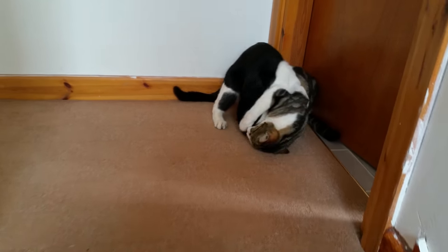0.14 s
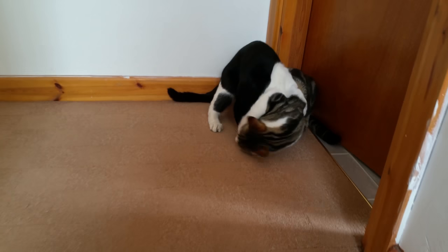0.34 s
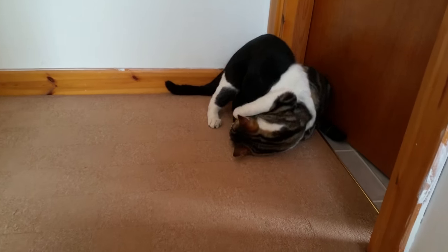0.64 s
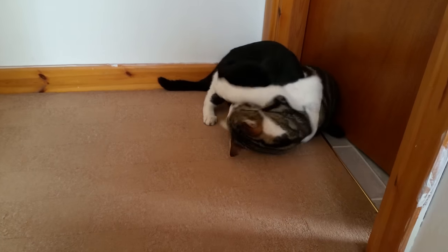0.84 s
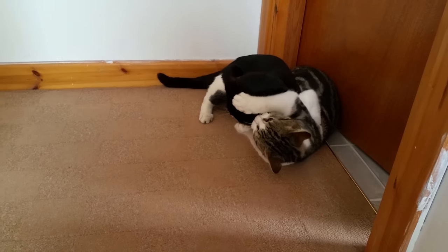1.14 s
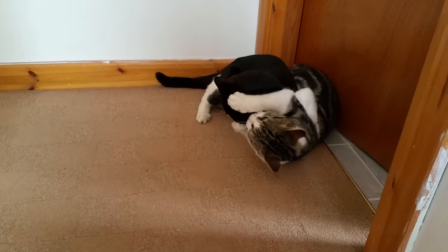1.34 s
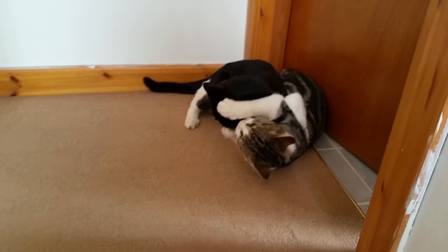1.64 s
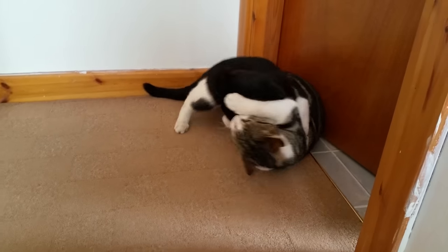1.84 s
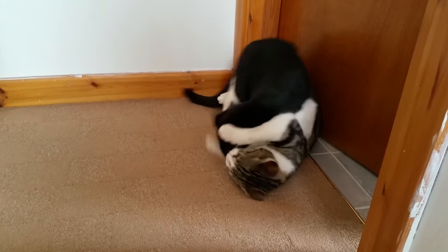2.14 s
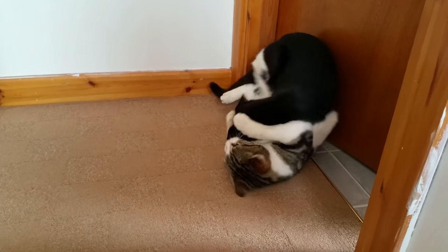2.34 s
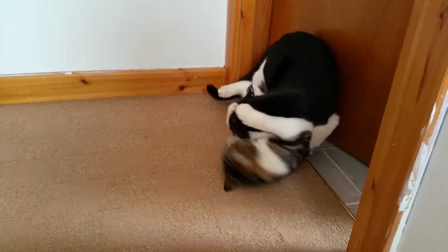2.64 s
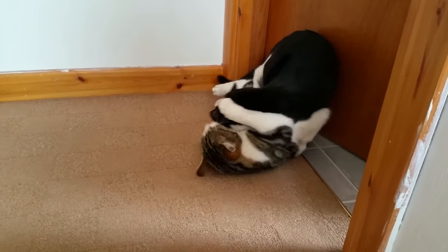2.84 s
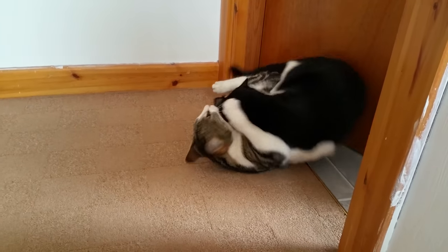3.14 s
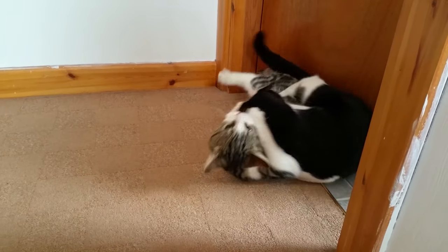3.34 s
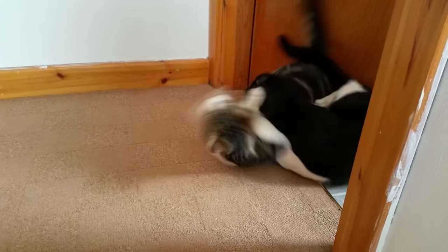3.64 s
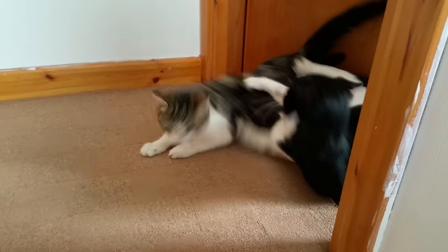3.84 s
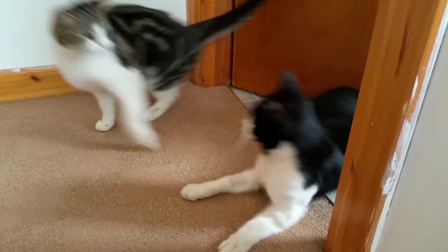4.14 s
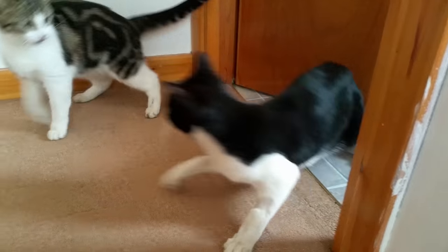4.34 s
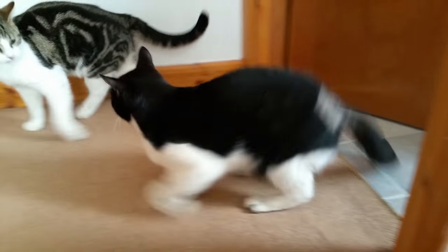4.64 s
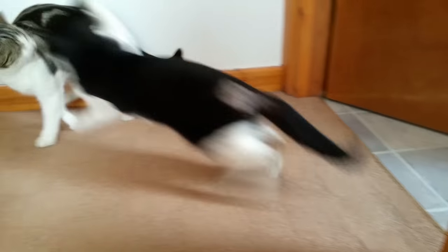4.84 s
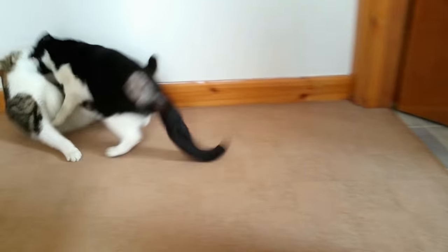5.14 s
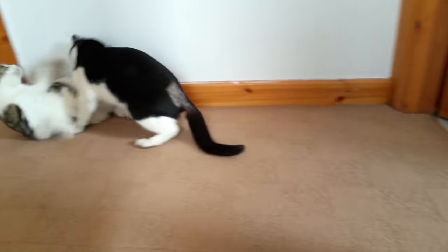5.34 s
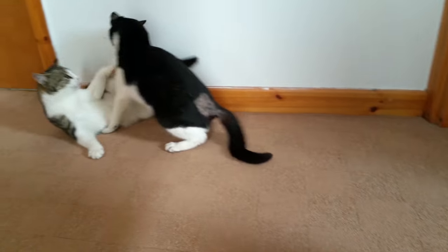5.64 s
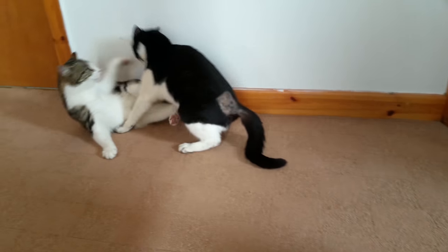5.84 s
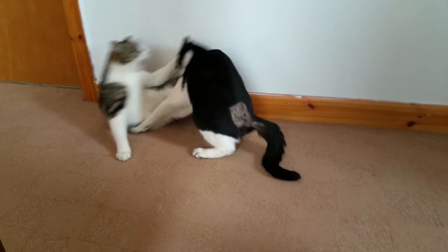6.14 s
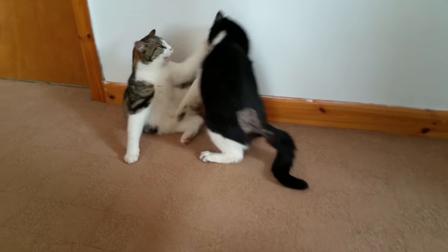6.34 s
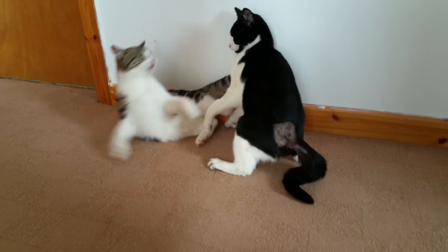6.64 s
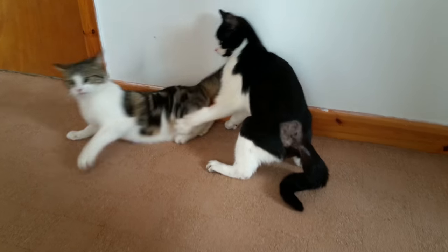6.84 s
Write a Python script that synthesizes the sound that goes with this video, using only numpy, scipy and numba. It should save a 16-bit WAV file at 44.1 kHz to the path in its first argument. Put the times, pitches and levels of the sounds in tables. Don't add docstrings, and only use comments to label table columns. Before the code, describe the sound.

Two cats wrestle on carpeted boards, captured by a nearby hand-held phone. One muffled yowl comes first, then mostly house hum and small scuffs, then squeaks and a chirp amid thudding bodies. A wail and very loud yelp follow, then a hoarse broken cry with a sharp claw scratch. Bare walls add a short reverberation.

```python
import sys
import numpy as np
from scipy import signal
from scipy.fft import rfft, irfft
from scipy.io import wavfile
from scipy.ndimage import uniform_filter1d, map_coordinates
from numba import njit

SR = 44100
rng = np.random.default_rng(int(sys.argv[2]) if len(sys.argv) > 2 else 0)


def volts_from_db(level):
    exponent = np.asarray(level, float) / 20
    return 10 ** exponent


def output_pcm(signal):
    pcm = np.clip(np.atleast_2d(signal).T, -1, 1) * 32767
    wavfile.write(sys.argv[1], SR, np.round(pcm).astype(np.int16))


N = 308700

# (frequency [Hz], density [dB/Hz])
HOUSE_SPECTRUM = [(12, -37), (20, -18.5), (53, -27.5), (76, -9.5), (274, -5), (372, -10), (550, -7),
                  (632, -12), (1100, -19.5), (1230, -17.5), (1500, -16.5), (3360, -33), (4440, -29.5),
                  (4960, -36), (15600, -44.5)]
# (frequency [Hz], likeness [0-1])
HOUSE_LIKENESS = [(60, 0.89), (250, 1), (600, 0.63), (1200, 0), (4000, .0)]
# (centre [Hz], width [Hz], level [dB])
HUMS = [(283, 17.3, -65.5), (426, 4, -70.5), (548.8, 9.4, -66), (660, 14, -77), (1072, 7.9, -77),
        (1495, 13, -72.5), (1481, 18, -77.5), (5220, 660, -82.5)]
# (time [s], level [dB])
WHINE_SWELLS = [
    (0.481, -73.5),
    (1.62, -83.5),
    (2.58, -87),
    (3.65, -113),
    (4.741, -80),
    (5.45, -81.5),
    (6.098, -85),
    (6.799, -88),
]
# (time [s], lag [rad])
WHINE_LAG = [(0, 2.7), (4.7, -.4), (6.4, -.6)]
# (time [s], level [dB], fade [dB/s])
WEIGHT_SHIFTS = [(0.0, -48.5, 211), (1.151, -66, 13), (2.161, -72, 60), (2.949, -55, 61),
                 (3.137, -47.5, 96), (3.47, -54, 25), (3.848, -40.5, 86), (4.001, -51, 43),
                 (4.388, -49, 123), (4.861, -49, 104), (5.161, -39.5, 73), (5.761, -48, 172),
                 (6.49, -41.5, 112), (6.95, -57, 30)]
# (time [s], peak [dB], floor ring [Hz], ring T60 [s], slap [dB])
THUMPS = [(0.009, -45.5, 255, 0.17, -11.5), (0.211, -52, 178, 0.13, 5), (0.952, -48, 160.2, 0.17, 5),
          (1.088, -46, 217, 0.19, -25), (1.169, -52, 238, 0.32, -2), (2.779, -56, 206, 0.49, 10.5),
          (2.924, -50, 216, 0.21, -5), (3.131, -42, 108.8, 0.4, -34), (3.446, -43.5, 86, 0.27, -33),
          (3.838, -26.5, 118, 0.1, -33), (3.84, -34.5, 85, 0.28, -34), (4.199, -52, 84, 0.3, -22),
          (4.299, -35, 190, 0.064, -24), (4.393, -42, 110, 0.13, -32), (4.847, -54, 109, 0.22, -22),
          (5.163, -33.5, 243.4, 0.18, 0.5), (5.299, -34, 231.5, 0.082, -20), (5.39, -47, 73.2, 0.12, 6.5),
          (5.49, -49.5, 229.6, 0.22, 5.5), (5.734, -45.5, 182.7, 0.37, 0), (6.482, -36.5, 156.6, 0.14, -2),
          (6.589, -46, 136, 0.11, -27)]
# (time [s], peak [dB], centre [Hz], length [s])
SCUFFS = [(0.08, -41, 1900, 0.0075), (0.666, -58, 2130, 0.017), (0.962, -71, 1950, 0.022),
          (1.6194, -73, 4380, 0.018), (1.949, -50, 1940, 0.028), (2.209, -47.5, 1600, 0.023),
          (2.917, -45, 1700, 0.015), (3.168, -63, 1870, 0.023), (3.348, -47.5, 2030, 0.026),
          (3.5563, -36, 2036, 0.017), (3.748, -33, 2114, 0.027), (4.077, -41.5, 1670, 0.034),
          (4.531, -69, 4400, 0.02), (4.938, -69, 4390, 0.022), (5.829, -68.5, 4400, 0.019),
          (6.253, -24, 1773, 0.013), (6.475, -61.5, 2050, 0.02), (6.916, -45.5, 1750, 0.028)]
# (time [s], pitch [Hz], effort [dB], jaw opening [0-1], tongue resonance [Hz])
MEW = [(0.195, 416.8, -78, 0, 2880), (0.213, 426, -51.5, 0.16, 2780), (0.25, 507.3, -58.5, 0.08, 2820),
       (0.29, 625, -57, 0.34, 2800), (0.335, 605, -59, 0.3, 2750), (0.362, 645, -58, 0.25, 2600),
       (0.395, 665, -55, 0.33, 2660)]
YOWL = [(0.399, 682, -58.5, 0.2, 2700), (0.446, 703, -51.5, 0.62, 2940), (0.521, 680, -49.5, 0.54, 2620),
        (0.631, 706, -47, 0.66, 2760), (0.716, 672, -56.5, 0.1, 2730), (0.759, 690, -58.5, 0.2, 2780),
        (0.885, 668, -51, 0.28, 2250), (0.957, 671, -52.5, 0.53, 2260), (0.999, 680, -80, 0.27, 2600)]
GRUNT = [(2.747, 412.4, -76, 0.63, 2500), (2.754, 414, -58, 0.62, 2500), (2.767, 386, -81, .9, 2500),
         (2.774, 379, -44, 0.67, 2500), (2.795, 363.6, -48.5, 0.53, 2605), (2.812, 328.4, -58, 0.17, 2860),
         (2.831, 345, -64, 0.18, 2750)]
SQUEAK = [(3.483, 1150, -71, 0.31, 2380), (3.498, 1173, -43, 0.41, 2350), (3.517, 1192, -45, 0.24, 2350),
          (3.525, 645, -34, 0.61, 2360), (3.537, 590.5, -51, 0.18, 2300), (3.552, 621, -39.5, 0.63, 2480),
          (3.568, 578.7, -57, 0.4, 2620), (3.584, 577, -77, 0.54, 2700)]
SQUEAL = [(3.655, 582, -65, 0.21, 2900), (3.667, 585.4, -39.5, 0.57, 3150),
          (3.695, 531.5, -39.5, 0.45, 3280), (3.722, 539.6, -39, 0.68, 2670), (3.733, 556, -43, 0.97, 2730),
          (3.785, 526.4, -51.5, 0.35, 2770)]
CHIRP = [(3.791, 1153, -65, 0.28, 2480), (3.805, 1250, -47, 0.049, 2420), (3.814, 1408, -51.5, 0.52, 2770),
         (3.83, 1379, -50.5, 0.11, 2800), (3.855, 1419, -74, 0.54, 2650)]
WAIL = [(5.036, 675, -67, 0.41, 2900), (5.054, 673, -54, 0.62, 2800), (5.088, 693, -49.5, 0.48, 3190),
        (5.139, 750.5, -45.5, 0.46, 3500), (5.178, 712.7, -41.5, 0.35, 3200),
        (5.205, 680, -26.5, 0.9, 2800), (5.217, 609.2, -37.5, 0.66, 2609), (5.26, 545, -45, 0.42, 2540),
        (5.319, 534.7, -74.5, 0.27, 2680)]
YELP = [(5.33, 691, -57, .3, 2960), (5.342, 734, -37, 0.79, 3000), (5.356, 745, -15.5, .95, 3020),
        (5.368, 735, -33, 0.5, 2950), (5.375, 755, -16.5, 0.9, 2690), (5.385, 715, -25, 0.9, 2700),
        (5.402, 680, -32, 0.85, 2570), (5.43, 687, -41, .6, 2800)]
CRY = [(6.228, 522, -58, 0.26, 2980), (6.251, 539.4, -51, 0.49, 3040), (6.269, 580, -46, 0.76, 4000),
       (6.298, 645, -45, 0.72, 3920), (6.339, 686.5, -51, 0.36, 3860), (6.376, 715, -41, 0.55, 3100),
       (6.392, 641.7, -41, 0.64, 3840), (6.42, 667, -59, 0.37, 3660), (6.446, 653.5, -58, 0.37, 3380)]
SOB = [(6.452, 663, -49.5, 0.53, 3000), (6.478, 659, -44, 0.6, 2900), (6.489, 725, -44, 0.45, 2830),
       (6.509, 725, -54, 0.41, 2920), (6.541, 742, -51, 0.54, 2880), (6.57, 750.2, -86, 0.44, 2930)]
CALLS = [
    MEW,
    YOWL,
    GRUNT,
    SQUEAK,
    SQUEAL,
    CHIRP,
    WAIL,
    YELP,
    CRY,
    SOB,
]
# (mouth resonance [Hz], upper [dB], rasp [dB], chest [dB], chest resonance [Hz])
CALL_COLOUR = [(2240, -7.5, -21.5, 1.5, 1030), (2050, -5.5, -31, 2, 1550), (2080, -10, -22, -1, 1200),
               (2050, -8, -18.5, -4, 1265), (1950, -34, -10.5, -2, 1200), (2030, -0.5, -1, 0, 1280),
               (2060, -5, -12, 4, 1410), (2007, -35, -14, 1, 1290), (2094, -6.5, -17, -0.5, 1220),
               (2050, -6.5, -45, -2, 2000)]
CALL_HOARSENESS = [(.65, .36, .15), (.1, .055, .5), (.05, .3, .35), (.06, .25, .55), (.45, .14, .4),
                   (.12, .12, .25), (.3, .11, .4), (.03, .16, .55), (.6, .15, .25), (.35, .13, .1)]
# (time [s], centre [Hz])
TEETH_RESONANCE = [(3.9, 5200), (5.0, 4355), (5.4, 4276), (6.3, 4500), (6.5, 3980)]
# (time [s], peak [dB], ring [Hz], ring decay [s])
KNOCKS = [
    (0.222, -39.5, 781, 0.01),
    (2.929, -43, 505, 0.0078),
    (5.165, -41, 610, 0.011),
    (5.736, -48, 590, 0.0044),
    (6.4835, -36, 830, 0.0033),
    (6.497, -57, 460, 0.0063),
]
# (time [s], peak [dB], centre [Hz])
CLAW_TICKS = [
    (3.558, -52, 5732),
    (3.662, -61, 5000),
    (3.772, -57, 5150),
    (4.09, -50, 6740),
    (4.505, -58, 12800),
    (4.948, -63, 3045),
    (5.811, -59, 5510),
    (6.254, -55, 7230),
]
# (frequency [Hz], T60 [s])
ROOM_T60 = [(100, 0.14), (700, 0.45), (2200, 0.24), (8000, 0.12)]
# (time [s], delay [s])
RIGHT_DELAY = [(4.2, .00005), (4.9, .00028), (5.6, .00028), (6.1, .00017)]
# (centre [Hz], width [Hz], share removed [0-1])
PORT_SHADOWS = [(4350, 1000, .4), (2500, 1500, .65)]
# (time [s], share [0-1])
RIGHT_SHADOW = [(5.3, 1), (5.34, .3), (5.6, .3), (6.0, 1)]


def unit(x):
    return x / np.sqrt(np.mean(x ** 2) + 1e-18)


@njit
def svf(x, centre_hz, width_hz):
    y, band_state, low_state = np.empty(len(x)), 0., 0.
    for i in range(len(x)):
        g = np.tan(np.pi * centre_hz[i] / SR)
        k = width_hz / centre_hz[i]
        v = (band_state + g * (x[i] - low_state)) / (1 + g * (g + k))
        band_state = 2 * v - band_state
        low_state += 2 * g * v
        y[i] = k * v
    return y


def band(x, centre_hz, width_hz):
    return svf(x, centre_hz + np.zeros(len(x)), float(width_hz))


def walk(rate_hz, count=N):
    hold = max(int(SR / rate_hz), 1)
    steps = np.repeat(rng.standard_normal(count // hold + 2), hold)
    return 1.427 * uniform_filter1d(uniform_filter1d(steps, hold), hold)[:count]


def over_time(table, t):
    return np.interp(t, *np.transpose(table))


def on_log(table, hz):
    f, v = np.transpose(table)
    return np.interp(np.log(np.maximum(hz, 1)), np.log(f), v)


def add(out, start_s, x):
    i = max(int(start_s * SR), 0)
    out[i:i + len(x)] += x[:len(out) - i]


def appliance_air():
    f = np.fft.rfftfreq(N, 1 / SR)
    alike = np.clip(on_log(HOUSE_LIKENESS, f), 0, 1)
    spectra = rfft(rng.standard_normal((2, N))) * volts_from_db(on_log(HOUSE_SPECTRUM, f))
    mid, side = spectra * np.sqrt([1 + alike, 1 - alike])
    air = irfft(np.array([mid + side, mid - side]), N)
    level_db = -57.5 + 0.077 * walk(3.9)
    return air / np.sqrt(np.mean(air.mean(axis=0) ** 2)) * volts_from_db(level_db)


def motor_tones():
    motor_hz, motor_db = 548.3, -61
    out = np.zeros((2, N))
    for hz, width_hz, db in HUMS:
        tone, other = (unit(band(rng.standard_normal(N), hz, width_hz)) for _ in range(2))
        out = out + volts_from_db(db) * (tone + 0.5 * other * np.array([[1], [-1]]))
    phase = 2 * np.pi * np.cumsum(motor_hz + 1.619 * walk(1.8)) / SR
    return out + np.sqrt(2) * volts_from_db(motor_db + 1.65 * walk(5.6)) * np.sin(phase)


def whine():
    whine_hz, rest_db, swell_s = 4390, -90, 0.34
    t = np.arange(N) / SR
    swell = volts_from_db(rest_db) + sum(volts_from_db(db) * np.exp(-((t - s) / swell_s) ** 2) for s, db in WHINE_SWELLS)
    phase = 2 * np.pi * np.cumsum(whine_hz + 8 * walk(1.6)) / SR
    left = np.sin(phase)
    right = 1.45 * np.sin(phase - over_time(WHINE_LAG, t))
    return np.sqrt(2) * swell * volts_from_db(5.0) * np.array([left, right])


def house():
    return (appliance_air() + motor_tones()) * volts_from_db([[.7], [-.7]]) + whine()


def shuffle():
    rise_db_per_s, still_db = 1200, -67.5
    t = np.arange(N) / SR
    weight = volts_from_db(still_db)
    for s, db, fade_db_per_s in WEIGHT_SHIFTS:
        drop_db = np.where(t < s, rise_db_per_s * (s - t), fade_db_per_s * (t - s))
        weight = weight + volts_from_db(db - drop_db)
    rumble = band(band(band(rng.standard_normal(N), 35.0, 80), 237, 190), 86, 260)
    return unit(rumble) * weight * volts_from_db(1.1 * walk(17) - 5.5)


def thumps():
    out, t = np.zeros(N), np.arange(SR // 2) / SR
    for s, peak_db, hz, t60_s, slap_db in THUMPS:
        noise = rng.standard_normal((2, len(t)))
        push = 1 - np.exp(-t / 0.0052)
        fade = push * np.exp(-np.log(1000) * t / max(t60_s, .02))
        ring = np.sin(2 * np.pi * hz * t) * np.exp(-t / 0.45)
        ring = ring + 0.51 * unit(band(noise[0], hz * 1.97, hz))
        slap = unit(band(band(noise[1], 492, 290), 470, 470))
        slap = slap * (np.exp(-t / 0.025) + 2.3 * np.exp(-t / 0.0066))
        slap = slap + 0.87 * np.sin(2 * np.pi * 350 * t) * np.exp(-t / 0.017)
        add(out, s, volts_from_db(peak_db - 2.0) * (fade * ring + volts_from_db(slap_db - 5.0) * slap))
    return out


def scuffs():
    out, t = np.zeros(N), np.arange(SR // 8) / SR
    for s, peak_db, hz, length_s in SCUFFS:
        grit = rng.standard_normal(len(t)) * volts_from_db(3 * rng.exponential(size=len(t)))
        scratch = unit(band(band(grit, hz, 0.33 * hz), 1800, 6000))
        x = t / max(length_s, .002) * 3
        add(out, s, volts_from_db(peak_db - 11) * scratch * x * np.exp(1 - x) / 2)
    return out


def gestures(t):
    settle, fray = .3, .85
    crack_s, crack_length_s, crack_rough = .66, .022, .25
    s, *moves = np.transpose(np.vstack(CALLS))
    s = np.maximum.accumulate(s)
    colours = np.repeat(CALL_COLOUR, [len(rows) for rows in CALLS], axis=0).T
    smooth = [uniform_filter1d(np.interp(t, s, c), SR // 200) for c in (*moves, *colours)]
    at = [np.interp([0, settle, fray, 1], [0, 1], [rows[0][0], rows[-1][0]]) for rows in CALLS]
    at = np.maximum.accumulate(np.concatenate(at))
    levels = np.concatenate([(onset, body, body, end) for onset, body, end in CALL_HOARSENESS])
    crack = crack_rough * np.exp(-((t - crack_s) / crack_length_s) ** 2)
    return (*smooth, np.interp(t, at, levels) + crack)


def vocal_folds(hz, rough):
    wobble = 1 + .007 * walk(55)
    wobble = wobble + .12 * rough * walk(300)
    phase = 2 * np.pi * np.cumsum(hz * wobble) / SR
    folds = sum(volts_from_db(2.2 * walk(50)) * np.cos(k * phase + .3 * k * k) for k in range(1, 13)) / np.sqrt(6)
    folds = folds * (1 + 0.043 * rough * np.cos(phase / 2))
    puffs = rng.standard_normal(N) * (1 + 1.0 * np.cos(phase))
    source = np.sqrt(1 - rough) * folds + np.sqrt(rough) * .9 * puffs
    return source, puffs, phase


def cat():
    t = np.arange(N) / SR
    hz, effort_db, jaw, upper_hz, mouth_hz, upper_db, rasp_db, chest_db, chest_hz, rough = gestures(t)
    mouth_hz = mouth_hz + 335 * (jaw - .5)
    chest_db = chest_db + 9.5 - 36.5 * jaw
    upper_db = upper_db - 15 * (jaw - .5) + 3.5 * (upper_hz / 1000 - 2.7)
    rasp_db = rasp_db - 16 * (jaw - .5)
    source, puffs, phase = vocal_folds(hz, rough)

    mouth = unit(band(band(band(source, mouth_hz, 670), mouth_hz, 1100), mouth_hz, 1400))
    chest = unit(band(band(source, chest_hz, 610), chest_hz * 0.76, 610))
    nasal = (t > .22) * (t < .94)
    chest = chest - volts_from_db(0.24) * nasal * np.sin(phase)
    upper = unit(band(band(band(source, upper_hz, 800), upper_hz, 1000), upper_hz, 2400))
    breathy = source + 3.6 * rough * puffs
    teeth_hz = over_time(TEETH_RESONANCE, t)
    teeth = band(band(breathy, teeth_hz, 950), teeth_hz * 1.465, 6400)
    hiss = band(band(breathy, 11100, 3900), 13000, 7200)
    rasp = unit(teeth + volts_from_db(-29.5) * hiss)
    colour = mouth - volts_from_db(chest_db) * chest - volts_from_db(upper_db) * upper + volts_from_db(rasp_db) * rasp

    voiced = sum((t > rows[0][0] - .002) & (t < rows[-1][0] + .008) for rows in CALLS) > 0
    gate = uniform_filter1d(voiced * 1., SR // 150)
    throb_hz, crest_s, depth_db = 16, .59, 2.5
    throb_db = depth_db * (t > .43) * (t < .93) * np.cos(2 * np.pi * throb_hz * (t - crest_s))
    flutter = volts_from_db(1.2 * walk(55)) * volts_from_db(throb_db)
    return gate * flutter * volts_from_db(effort_db - 1.5) * colour


def knocks():
    out, t = np.zeros(N), np.arange(SR // 10) / SR
    for s, peak_db, hz, decay_s in KNOCKS:
        add(out, s, volts_from_db(peak_db) * np.sin(2 * np.pi * hz * t) * np.exp(-t / max(decay_s, .001)))
    return out


def claw_ticks():
    out, t = np.zeros(N), np.arange(SR // 50) / SR
    for s, peak_db, hz in CLAW_TICKS:
        click = unit(band(band(rng.standard_normal(len(t)), hz, hz * .8), hz, hz * 1.2))
        add(out, s, volts_from_db(peak_db) * click * np.exp(-t / 0.00034))
    return out


def wall_tail(wet_db):
    t = np.arange(int(.7 * SR)) / SR
    tail = 0
    for hz in 90 * 2 ** np.arange(0, 7.1, 1):
        mid, side = (band(n, hz, hz * 2.24) for n in rng.standard_normal((2, len(t))))
        noise = mid + min(hz / 900, 1.3) * side * np.array([[1], [-1]])
        decay = np.exp(-np.log(1000) * t / on_log(ROOM_T60, hz))
        tail = tail + noise / np.std(noise) * np.sqrt(hz) * decay
    tail = tail * np.clip((t - .003) / 0.0054, 0, 1)
    return tail / np.sqrt(np.sum(tail ** 2) / 2) * volts_from_db(wet_db)


def room(x, wet_db, left_db):
    tail = wall_tail(wet_db)
    shade = np.exp(-np.arange(40) / 1.97)
    left = volts_from_db(left_db) * np.convolve(x, shade / shade.sum())[:N]
    i = np.arange(N)
    lag = 2 + SR * over_time(RIGHT_DELAY, i / SR)
    right = volts_from_db(-left_db) * map_coordinates(x, [i - lag], mode="nearest")
    return signal.fftconvolve(x[None], tail, axes=1)[:, :N] + np.array([left, right])


def ports(x):
    strengths = [1, over_time(RIGHT_SHADOW, np.arange(N) / SR)]
    out = []
    for v, strength, (hz, width_hz, share) in zip(x, strengths, PORT_SHADOWS):
        out.append(v - strength * share * band(v, hz, width_hz))
    return np.array(out)


def scene():
    boards = room(thumps() + knocks(), wet_db=-7.5, left_db=0.94) + shuffle() * volts_from_db([[.8], [-.8]])
    high_pass = signal.butter(4, 62, "high", fs=SR, output="sos")
    boards = signal.sosfilt(high_pass, boards)
    near = room(cat() + scuffs() + claw_ticks(), wet_db=-8, left_db=1.5)
    return ports(near) * volts_from_db(3.5) + boards + house()


def low_pass(x):
    return signal.sosfilt(signal.butter(12, 15700, fs=SR, output="sos"), x)


def record(dry):
    return low_pass(dry)


dry = scene()
out = record(dry)
output_pcm(out)
```